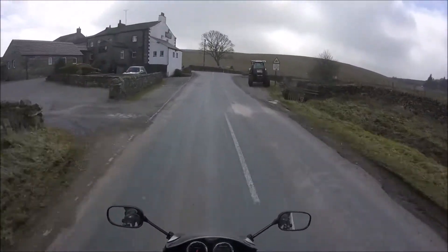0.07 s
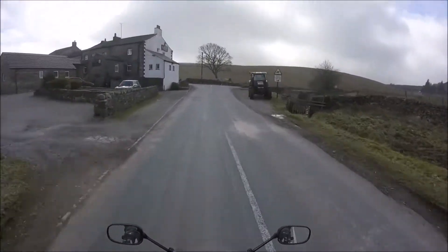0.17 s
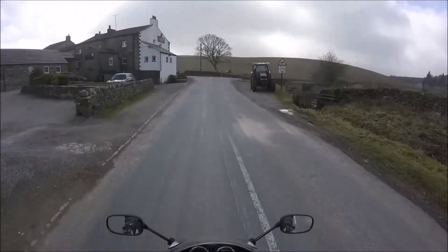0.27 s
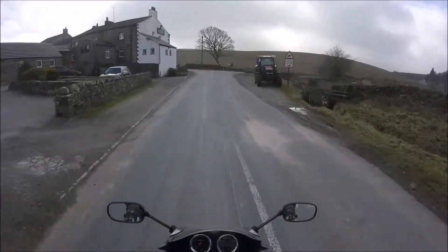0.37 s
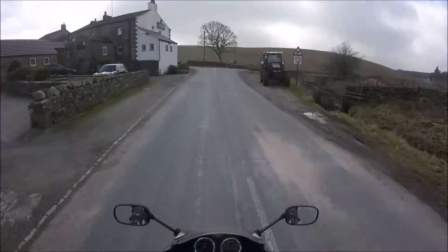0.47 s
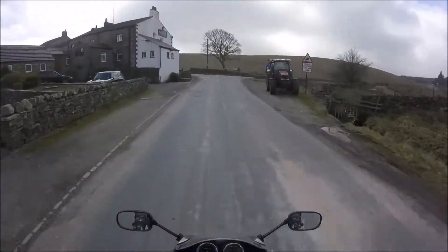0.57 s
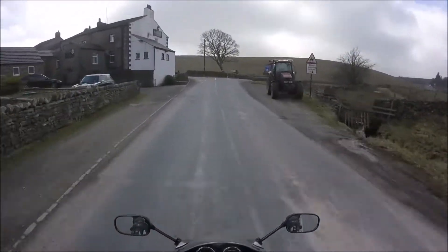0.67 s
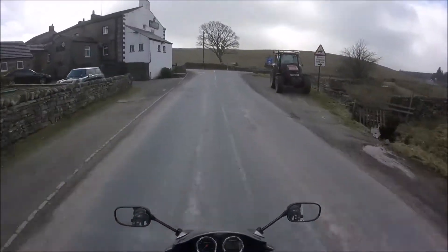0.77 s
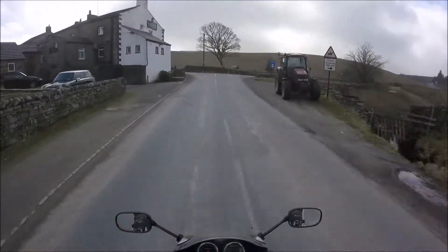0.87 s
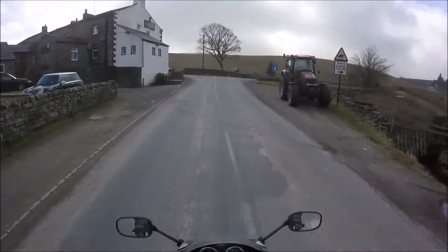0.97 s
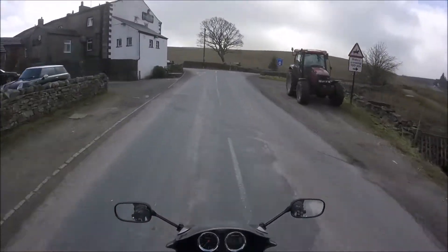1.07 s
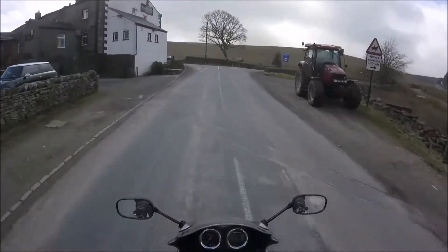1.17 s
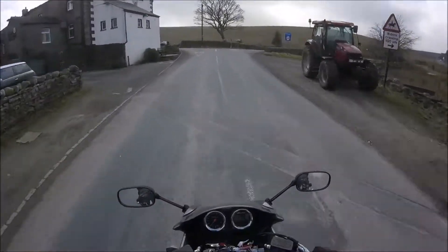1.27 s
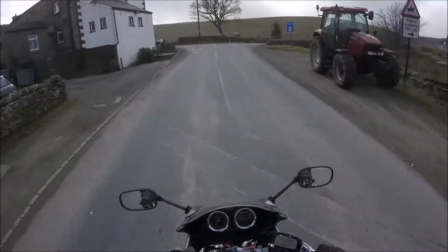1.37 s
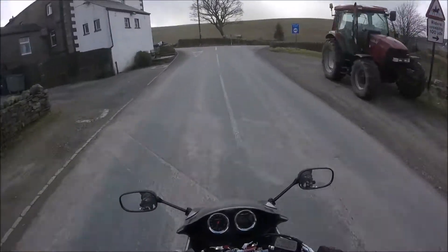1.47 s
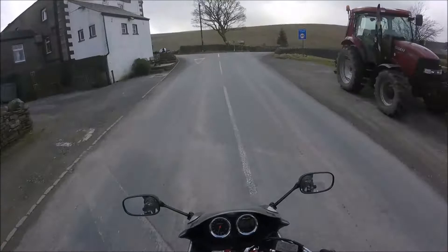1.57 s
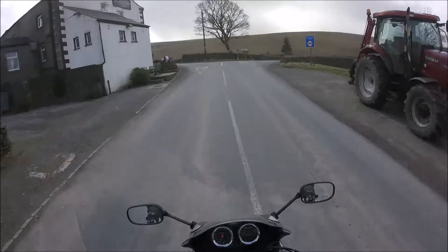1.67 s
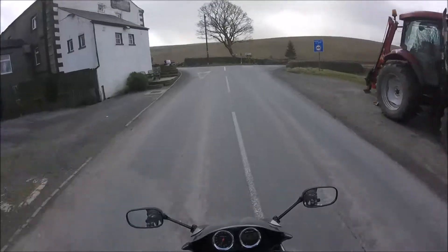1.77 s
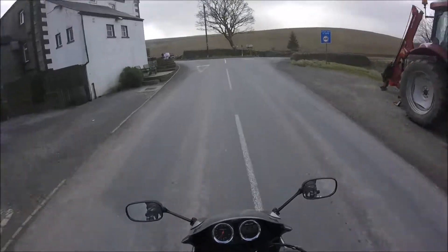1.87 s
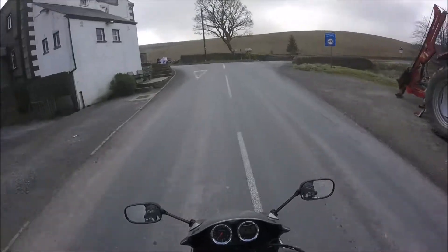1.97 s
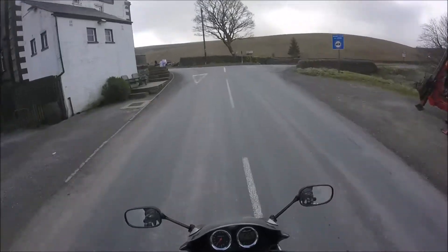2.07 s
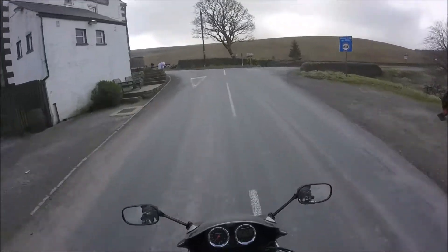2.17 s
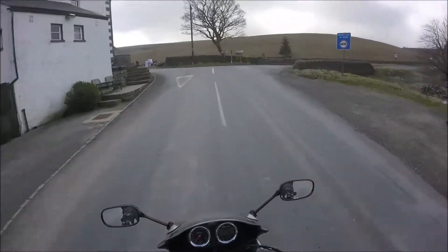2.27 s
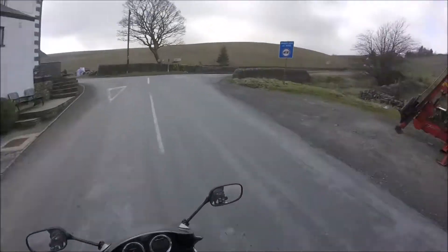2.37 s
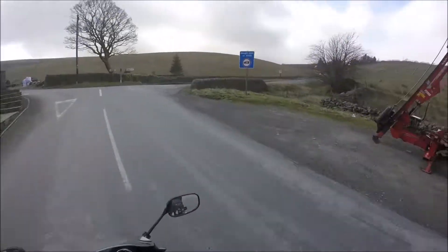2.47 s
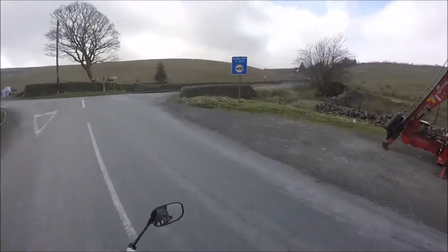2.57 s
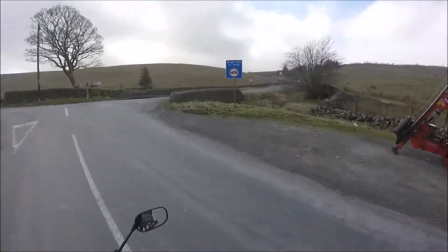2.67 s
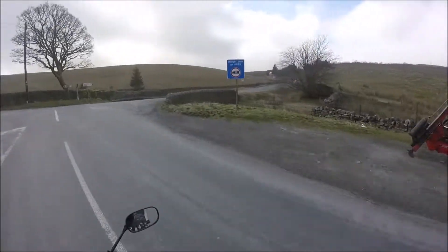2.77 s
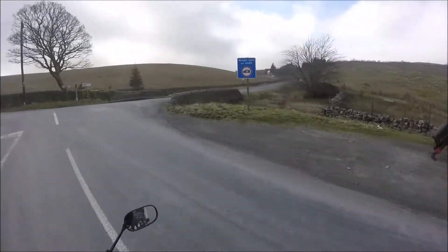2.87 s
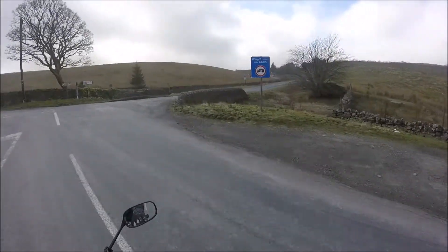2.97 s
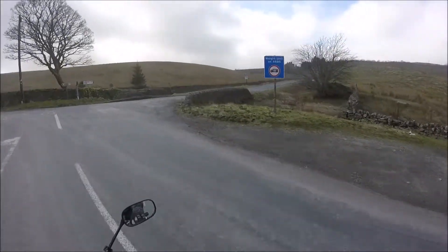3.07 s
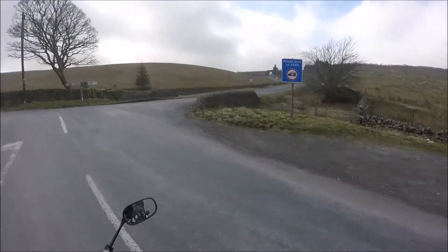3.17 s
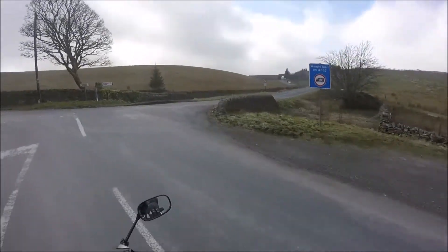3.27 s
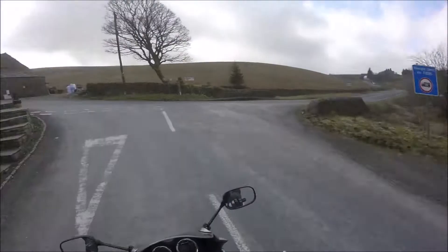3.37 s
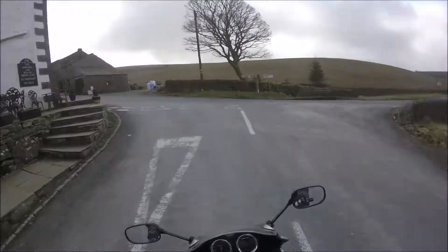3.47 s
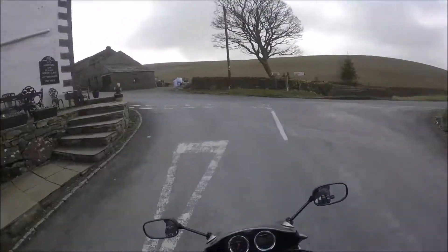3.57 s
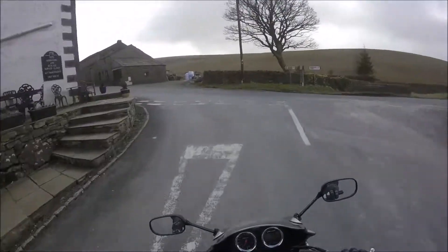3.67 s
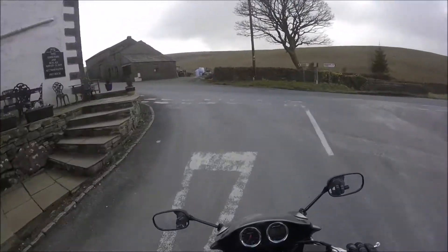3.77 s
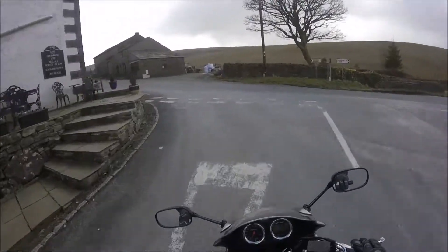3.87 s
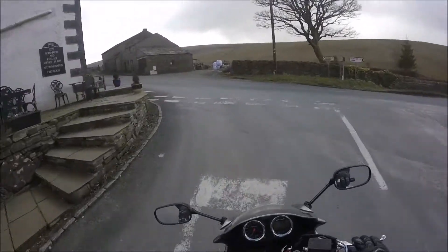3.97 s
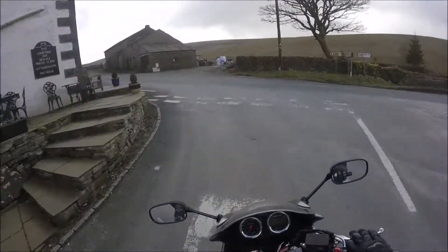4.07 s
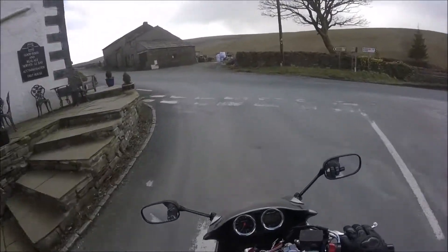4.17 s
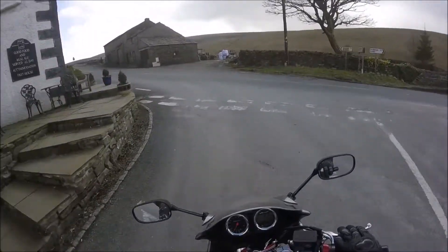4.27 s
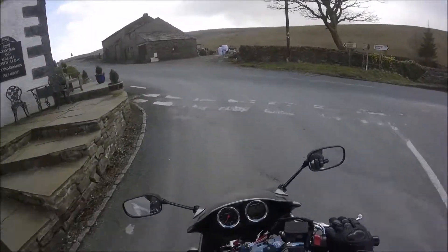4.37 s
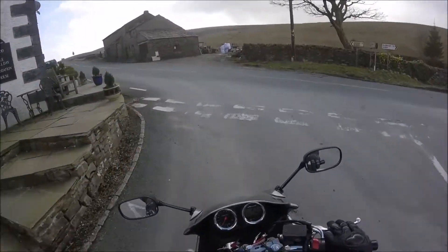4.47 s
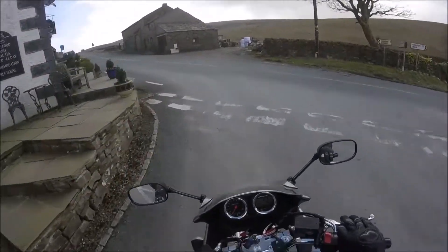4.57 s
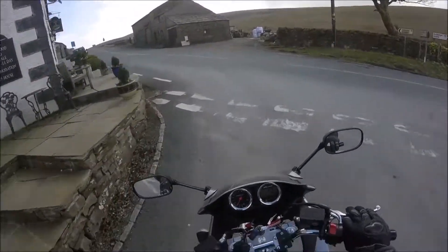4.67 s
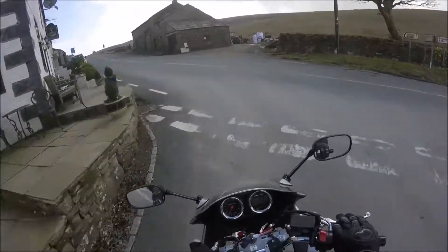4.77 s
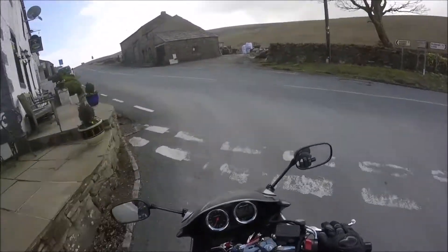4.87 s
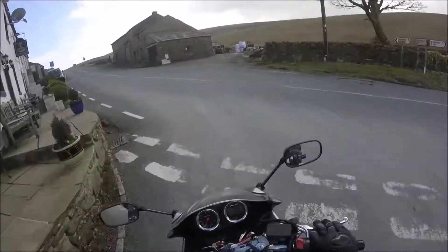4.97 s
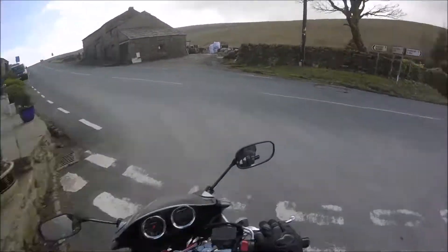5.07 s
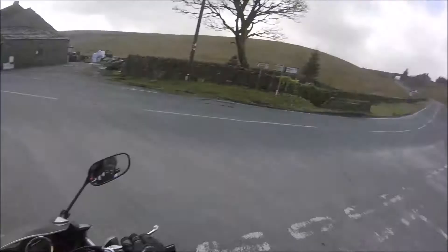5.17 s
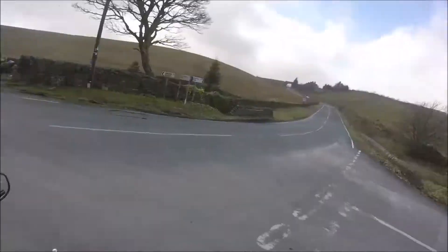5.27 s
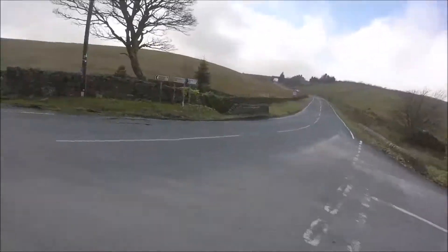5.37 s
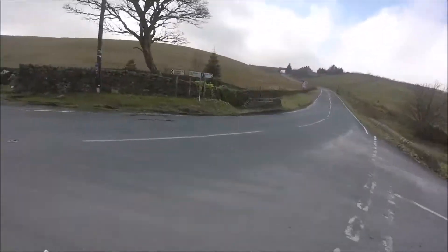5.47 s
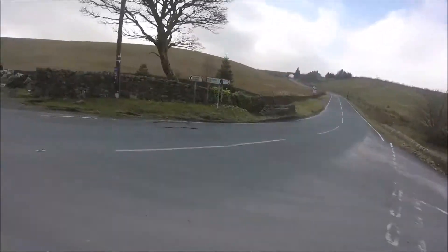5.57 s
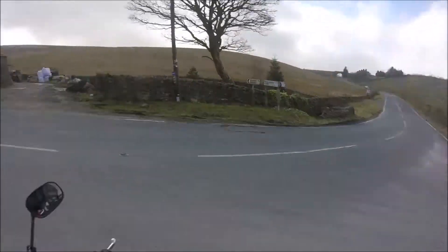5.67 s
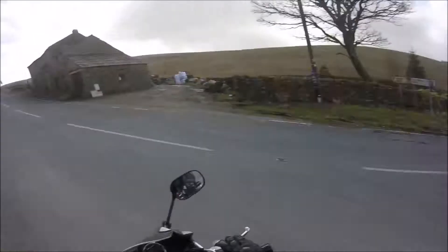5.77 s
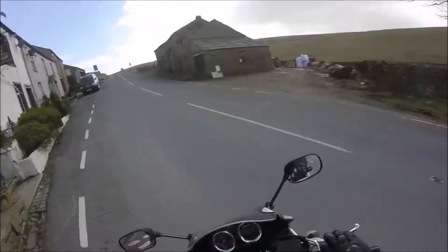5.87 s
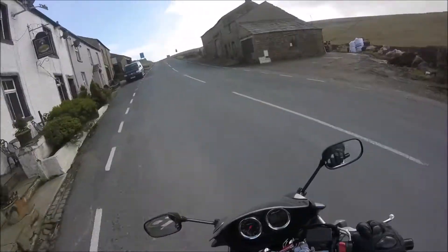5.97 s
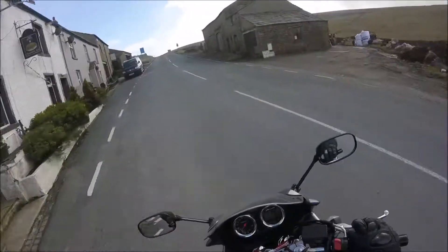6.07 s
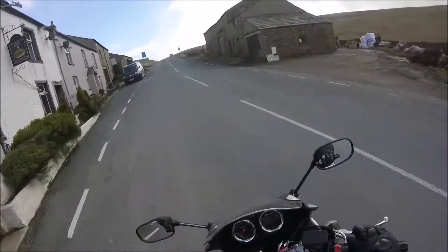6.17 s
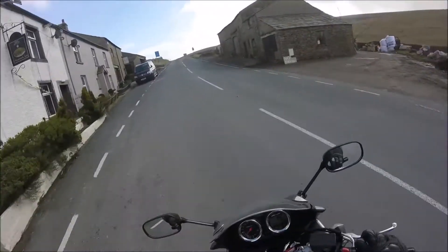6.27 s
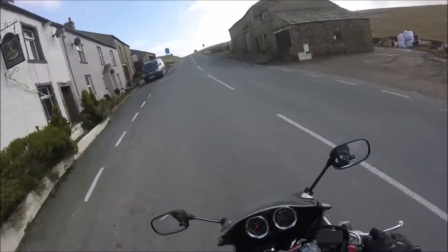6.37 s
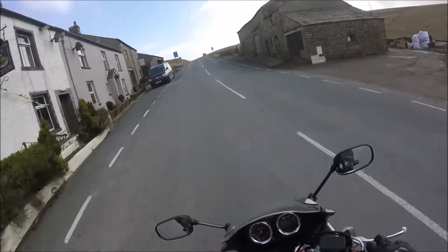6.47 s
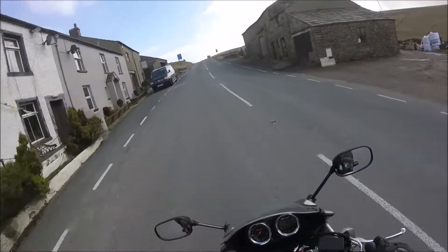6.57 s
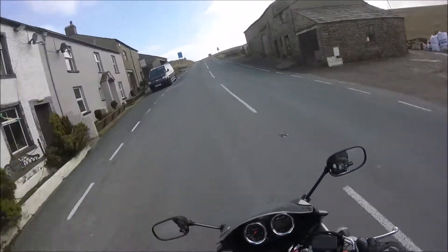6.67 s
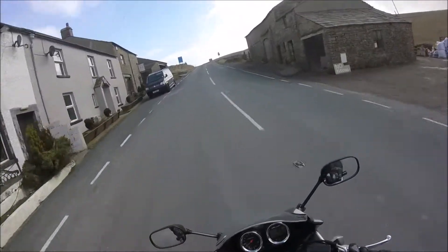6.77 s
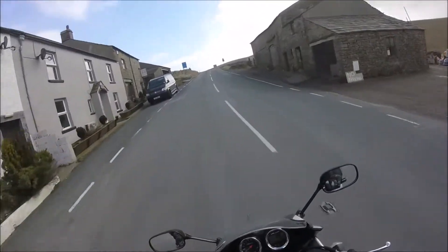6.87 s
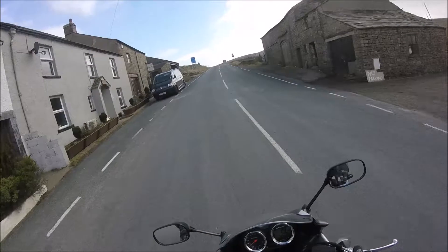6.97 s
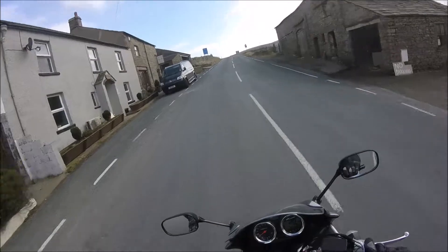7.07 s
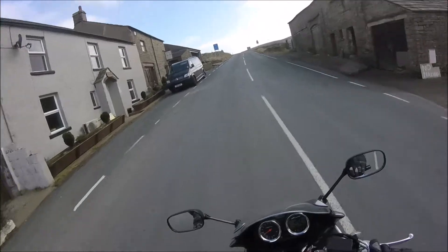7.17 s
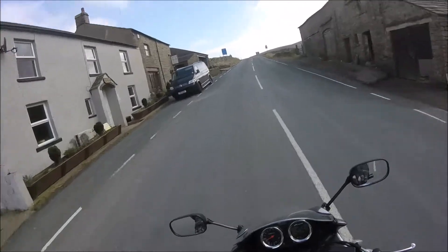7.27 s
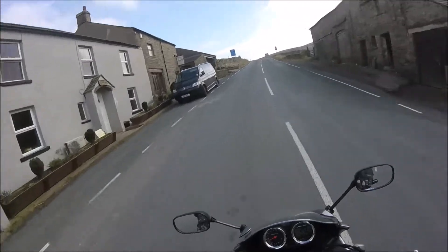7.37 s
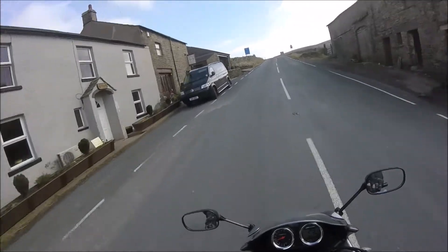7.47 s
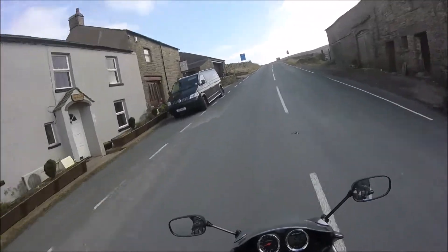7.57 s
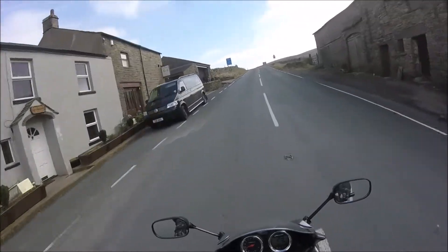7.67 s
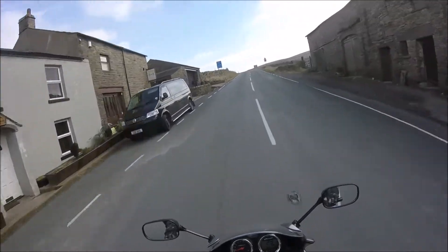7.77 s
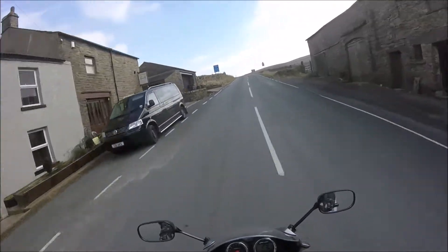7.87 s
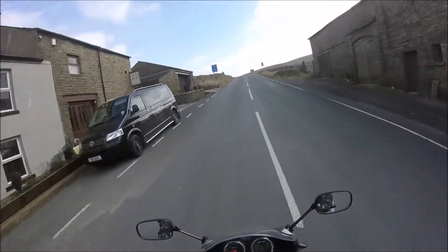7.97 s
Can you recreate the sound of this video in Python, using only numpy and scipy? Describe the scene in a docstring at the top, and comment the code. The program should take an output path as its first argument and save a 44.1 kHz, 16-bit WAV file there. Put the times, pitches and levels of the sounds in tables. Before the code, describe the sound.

From inside a rider's helmet, strong gusting wind with a tiny early whistle covers a low, throbbing motorcycle engine. The wind dies down as the bike slows at a rural junction. The engine then revs up, its buzzing whine and clatter climbing steadily. A few soft bumps lead to one loud, dry knock very close by, and wind creeps back at the end.

```python
"""Inside a motorcycle rider's helmet: wind rushes and buffets in gusts (shaped noise), with a brief early
whistle (an unsteady sine), and eases as the bike rolls up to a village junction. Past four seconds the engine
revs up to pull away: exhaust and gear lines sweep through the helmet's resonances over a throbbing clatter.
Soon a few soft low thumps and one sharp knock, like the visor snapping shut, set the shell's modes ringing;
towards the end the wind picks up again."""
import sys
import numpy as np
from scipy import signal
from scipy.fft import rfft, irfft
from scipy.io import wavfile

SR = 44100
rng = np.random.default_rng(int(sys.argv[2]) if len(sys.argv) > 2 else 0)


def file_out(sig):
    """Save sig as 16-bit WAV at sys.argv[1]."""
    # one column per channel
    cols = np.atleast_2d(sig).T
    # limit, then scale
    lim = np.clip(cols, -1, 1)
    pcm = np.round(lim * 32767).astype(np.int16)
    wavfile.write(sys.argv[1], SR, pcm)


N = 353682
TIME = np.arange(N) / SR

# airflow round the helmet, dying away towards the junction and picking up after it:
# (time [s], level of the rush before gusts and eddies [dB])
AIRFLOW = [(0, -43.5), (1.25, -47.5), (1.42, -56.5), (2.6, -61), (2.95, -63), (3.78, -65), (3.98, -73.5),
           (7.2, -68.5), (8.02, -59.5)]
CRUISE_DB = -46  # airflow level at road speed


def engine(throb=0.14, clatter_flutter_db=0.4, gear_rough=0.14, gear_surge_db=-1.5):
    """Exhaust pulses, meshing gears and valve-train clatter, all following the revs."""
    # idling, then pulling away: (time [s], firing rate [Hz])
    revs = [(0, 46), (4.0, 43.6), (4.35, 54.3), (4.88, 59.3), (5.14, 63.4), (5.85, 79.8), (6.93, 102.6),
            (7.55, 122), (8.02, 133.7)]
    # throttle, easing off and then opened in two steps: (time [s], effort [dB])
    throttle = [(0, 11), (4.28, 0.5), (4.5, 7.5), (6.45, 4), (6.85, 12.5), (7.3, 11), (7.7, 10.5),
                (8.02, 6)]
    # exhaust lines: (multiple of the firing rate, relative level [dB])
    exhaust_lines = [(1, -4.5), (1.5, -17), (2, -7), (3, -12), (4, -9), (5, -15), (6, -26), (7, -23.5)]
    # gear whine lines: (multiple of the tooth rate, relative level [dB])
    whine_lines = [(1, -6.5), (2, -5), (3, -5), (4, -11), (5, -9.5), (6.3, -10), (7, -10), (8, -9.5)]
    # clatter before the helmet: (frequency [Hz], relative level [dB])
    clatter_colour = [(100, -20.5), (300, -13), (550, 3), (900, -5), (1200, 0), (1500, 6), (1900, 1),
                      (3000, -8), (4400, -15.5), (5000, -8), (5400, -16), (6100, -20.5), (7500, -17.5),
                      (10000, -23.5), (15000, -34.5)]
    idle_hz = 44
    teeth_per_firing = 4.2
    exhaust_db = -71.5  # at zero effort
    # clatter at idle revs and road speed; its rise with revs; its share of the airflow's swing
    clatter_base_db, clatter_db_per_octave, clatter_follows = -60, 6.5, 0.19
    # whine at idle revs and zero effort; its rise with revs; its share of the throttle's effort
    whine_base_db, whine_db_per_octave, whine_follows = -79, 8.5, 0.25
    clutch_s, clutch_bite_s = 4.3, 0.04  # the clutch bites and loads the gears

    (firing_hz,), (effort_db,), (air_db,) = in_time(revs), in_time(throttle), in_time(AIRFLOW)
    octaves = np.log2(firing_hz / idle_hz)
    clatter_db = clatter_base_db + clatter_db_per_octave * octaves
    clatter_db = clatter_db + clatter_follows * (air_db - CRUISE_DB)
    whine_db = whine_base_db + whine_db_per_octave * octaves + whine_follows * effort_db
    engaged = np.clip((TIME - clutch_s) / clutch_bite_s, 0, 1)
    # the firing rate wanders slightly
    firing_hz = firing_hz * (1 + 0.002 * drift(rate=14.4))

    exhaust = 0
    for k, db in exhaust_lines:
        exhaust = exhaust + from_db(db) * engine_line(k * firing_hz, rough=0.11 * (1 + k), rate=14)

    # play between the teeth blurs the higher lines most
    tooth_hz = teeth_per_firing * firing_hz
    whine = 0
    for k, db in whine_lines:
        surge = from_db(db + gear_surge_db * drift(rate=3.8))
        whine = whine + surge * gear_line(k * tooth_hz, rough=gear_rough * k, rate=8 * k)

    # the clatter throbs with each firing
    firing_throb = 1 + throb * np.cos(2 * np.pi * np.cumsum(firing_hz) / SR)
    flutter = from_db(clatter_flutter_db * drift(rate=15))
    clatter = helmet_noise(clatter_colour) * firing_throb * flutter

    exhaust = from_db(exhaust_db + effort_db) * exhaust
    whine = engaged * from_db(whine_db) * whine
    return exhaust + whine + from_db(clatter_db) * clatter


def engine_line(hz, rough, rate):
    """One line of the engine; it swells as it climbs through a resonance of the helmet."""
    # how well the engine's lines reach the helmet: (frequency [Hz], gain [dB])
    tone_path = [(50, 4.5), (85, -7.5), (120, 1.5), (220, -4.5), (330, -12), (420, -3.5), (500, -4),
                 (590, -0.5), (700, -2), (930, -13), (1100, -2.5), (1280, -0.5), (1450, 1), (1900, -7),
                 (2300, -9), (3500, -18)]
    gain = from_db(at_hz(tone_path, hz) + helmet_db(hz))
    return gain * wavering_tone(np.cumsum(hz) / SR, rough, rate)


def gear_line(hz, rough, rate):
    """One line of the gear whine; it flares as it crosses each narrow resonance."""
    # resonances met by the whine: (frequency [Hz], width [Hz], lift [dB])
    whine_peaks = [(1127, 79, 5.5), (1305, 36, 6.5), (1465, 150, 7.5), (1645, 75, 5), (2190, 74, 5),
                   (2686, 120, 10.5), (3530, 190, 7.5)]
    flare_db = sum(db * bell(hz, centre, width) for centre, width, db in whine_peaks)
    return from_db(flare_db) * engine_line(hz, rough, rate)


def knock():
    """Contacts strike the shell's modes; the shorter a contact, the higher the modes it wakes."""
    # three nudges, first touch and its tick, main blow: (time [s], impulse [dB], contact spread [s])
    contacts = [(5.219, -18, 0.0031), (5.282, -30, 0.0014), (5.302, -42.5, 0.00034),
                (5.6675, -20.5, 0.00042), (5.6691, -47, 0.000073), (5.6845, 1.8, 0.0013)]
    # helmet shell modes: (frequency [Hz], level [dB], time to fall 60 dB [s])
    shell = [(103.5, -18, 0.27), (84, -22, 0.038), (146, -45, 0.088), (249, -34, 0.23), (300, -14, 0.045),
             (403, -12.5, 0.019), (636, -30, 0.033), (1700, -0.5, 0.0063), (2350, 0.5, 0.023),
             (3870, -9.5, 0.015), (7500, -22, .005)]
    force = 0
    for s, db, contact in contacts + latch():
        press = np.exp(-.5 * ((TIME - s) / contact) ** 2)
        area = contact * SR * np.sqrt(2 * np.pi)
        force = force + from_db(db) * press / area
    return -sum(from_db(db) * ring(force, hz, t60) for hz, db, t60 in shell)


def latch(count=4):
    """The contacts of the latch: a snap with the main blow, then uneven bounces, each weaker."""
    snap_s, snap_db, contact_s = 5.6850, -30, 0.00008
    bounce_s, loss_db = 0.0034, 6  # mean gap; loss at each bounce
    gaps = rng.uniform(.6, 1.4, count - 1)
    delays = bounce_s * np.r_[0, np.cumsum(gaps)]
    return [(snap_s + delay, snap_db - k * loss_db, contact_s) for k, delay in enumerate(delays)]


def ring(force, hz, t60):
    """A two-pole resonator: a unit impulse sets a cosine of height 1 ringing and dying away."""
    r = from_db(-60 / (t60 * SR))
    w = 2 * np.pi * hz / SR
    # the tiny offset keeps the filter clear of vanishingly small numbers
    return signal.lfilter([1, -r * np.cos(w)], [1, -2 * r * np.cos(w), r * r], force + 1e-18)


def wind(buffet_lump_db=1.02, eddy_db=1.46, hiss_db=-60, hiss_growth=1.51):
    """Lumpy buffeting below, a rush in the cavity above, and a fine hiss that grows faster with airflow."""
    # smooth swells: (time [s], width at half height [s], rush lift [dB], buffeting lift [dB])
    gusts = [(0.203, 0.27, 0.5, 4.5), (0.361, 0.074, 4.5, 2), (0.754, 0.16, 3, 2), (1.2, 0.087, 3, 1),
             (1.7, 0.22, 3.5, 4.5), (2.5, 0.33, 6, 2), (3.37, 0.12, 3, -1.5)]
    # spectra before the helmet, each: (frequency [Hz], relative level [dB])
    buffet_colour = [(12, 7), (25, 1.5), (60, -2), (140, -7), (300, -7.5), (550, -15.5), (900, -21),
                     (2000, -54.5)]
    rush_colour = [(200, -29), (700, -24), (1100, -6), (1500, -8), (1850, 2.5), (2200, -.5), (3000, 4.5),
                   (4000, -2), (5000, -18), (8000, -28.5), (15000, -67)]
    hiss_colour = [(2000, -26), (4300, -4), (5200, 3.5), (7000, 1.5), (9500, 0), (11000, -9.5),
                   (13000, -14.5), (14500, -27), (16000, -30)]
    # buffeting at road speed; its share of the airflow's swing
    buffet_base_db, buffet_follows = -51, 0.56

    (air_db,) = in_time(AIRFLOW)
    flow_db = air_db + eddy_db * drift(rate=17)
    buffet_db = buffet_base_db + buffet_follows * (air_db - CRUISE_DB)
    for s, length, rush_lift_db, buffet_lift_db in gusts:
        swell = bell(TIME, s, length)
        flow_db = flow_db + rush_lift_db * swell
        buffet_db = buffet_db + buffet_lift_db * swell
    buffet = from_db(buffet_db + buffet_lump_db * drift(rate=8.0)) * helmet_noise(buffet_colour)
    rush = from_db(flow_db) * helmet_noise(rush_colour)
    hiss = from_db(hiss_db + hiss_growth * (flow_db - CRUISE_DB)) * helmet_noise(hiss_colour)
    return buffet + rush + hiss


def whistle():
    """A brief, unsteady edge tone at the visor: a sine gliding in pitch, roughened by fast wavering."""
    # glide of the tone: (time [s], pitch [Hz], level [dB])
    edge_tone = [(.27, 5500, -75), (.30, 5720, -48.5), (.335, 6460, -53.5), (.37, 6130, -55),
                 (.40, 5660, -50.5), (.43, 5370, -88)]
    hz, level_db = in_time(edge_tone)
    blowing = (TIME > edge_tone[0][0]) & (TIME < edge_tone[-1][0])
    return blowing * from_db(level_db) * wavering_tone(np.cumsum(hz) / SR, rough=2.4, rate=40)


def helmet_noise(colour):
    """Noise of a smooth colour, sounding through the helmet's resonances; rms 1."""
    hz = np.arange(1, N // 2 + 2) * SR / N
    gain = from_db(at_hz(colour, hz) + helmet_db(hz))
    return rms_one(irfft(rfft(rng.standard_normal(N)) * gain, N))


def helmet_db(hz):
    """Lift that the cavity gives at each frequency: one bell for each resonance."""
    # resonances of the helmet cavity: (frequency [Hz], width [Hz], lift [dB])
    cavity = [(87, 31.4, 14.5), (381, 71, 8), (959, 60, 4.5), (1409.4, 245, 17), (1617, 140, 11),
              (2193, 327, 11.5), (2536, 302, 10), (3417, 240, 9), (3860, 430, 3.5), (5927, 535, 12),
              (6324, 450, 9.5), (7450, 600, 4.5), (8080, 270, 8), (8910, 620, 5.5)]
    grid = np.arange(SR // 2)
    lift = sum(db * bell(grid, centre, width) for centre, width, db in cavity)
    return np.interp(hz, grid, lift)


def wavering_tone(turns, rough, rate):
    """A sine on a running phase, whose height and phase are shaken by a share `rough`."""
    shake = 1 + rough * (drift(rate) + 1j * drift(rate))
    level = np.sqrt(2 / (1 + 2 * rough ** 2))  # holds the rms near 1
    return np.real(shake * np.exp(2j * np.pi * turns)) * level


def drift(rate):
    """Smooth random wandering, about `rate` turns a second; spread 1."""
    hz = np.arange(N // 2 + 1) * SR / N
    return rms_one(irfft(rfft(rng.standard_normal(N)) / (1 + (hz / rate) ** 2), N))


def in_time(rows):
    """Each column of a curve, at every sample."""
    s, *columns = np.transpose(rows)
    return [np.interp(TIME, s, c) for c in columns]


def at_hz(points, hz):
    """Read a spectrum in dB, on a log-frequency axis."""
    points_hz, points_db = np.transpose(points)
    return np.interp(np.log(hz), np.log(points_hz), points_db)


def bell(x, centre, width):
    """A smooth hump of height 1, `width` across at half height."""
    return np.exp2(-np.minimum((2 * (x - centre) / width) ** 2, 60))


def from_db(db):
    """Decibels to gain."""
    return 10 ** (np.asarray(db) / 20)


def rms_one(x):
    """Scale to unit rms."""
    return x / np.sqrt(np.mean(x ** 2) + 1e-20)


def scene():
    """Everything meets at one microphone inside the helmet."""
    return (engine() + knock() + wind() + whistle())[None, :]


def record(dry):
    """The sound eases in over two milliseconds; the top is cut steeply."""
    cutoff_hz = 15400
    opening = np.minimum(TIME / .002, 1)
    # ripple of 0.1 dB below the cutoff, 80 dB down above it
    steep_cut = signal.ellip(10, .1, 80, cutoff_hz, fs=SR, output="sos")
    return signal.sosfilt(steep_cut, dry * opening)


dry = scene()
out = record(dry)
file_out(out)
```